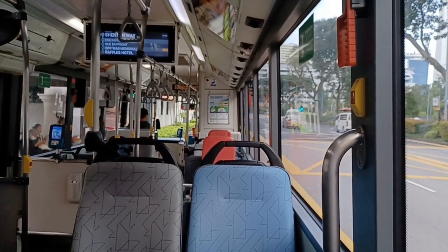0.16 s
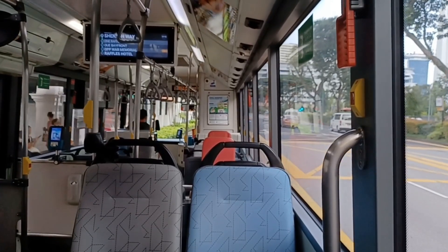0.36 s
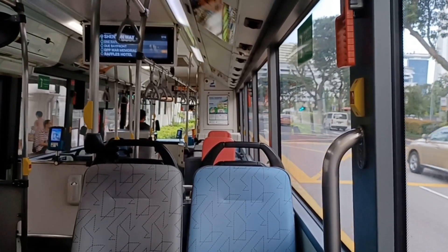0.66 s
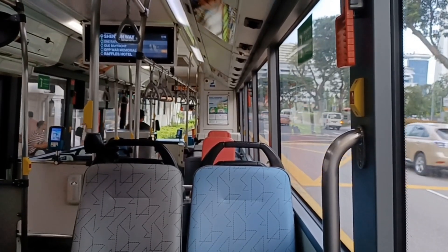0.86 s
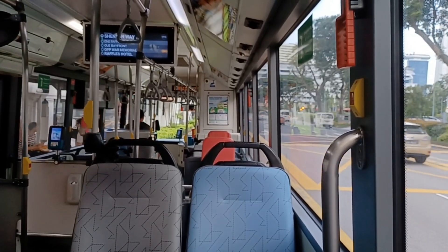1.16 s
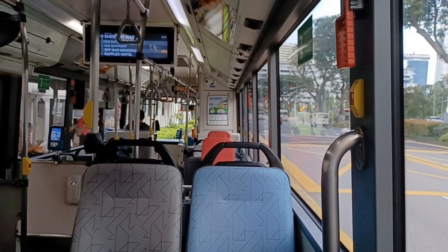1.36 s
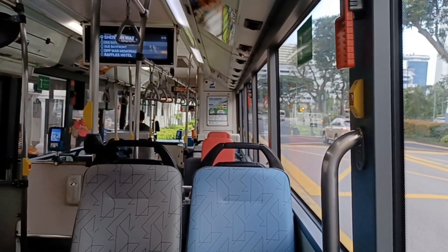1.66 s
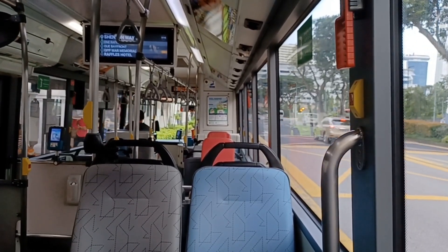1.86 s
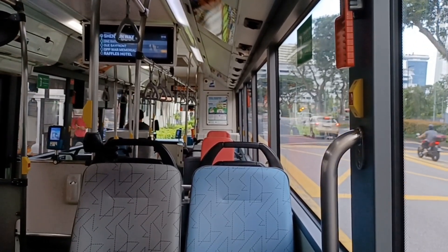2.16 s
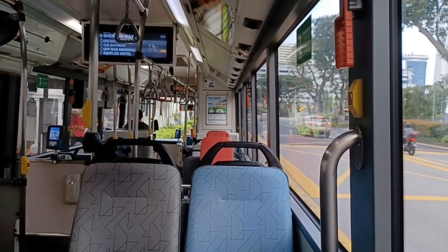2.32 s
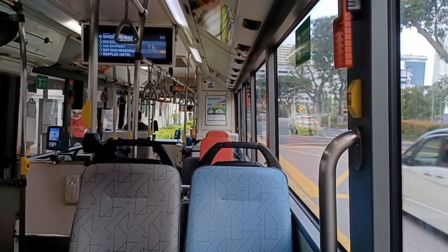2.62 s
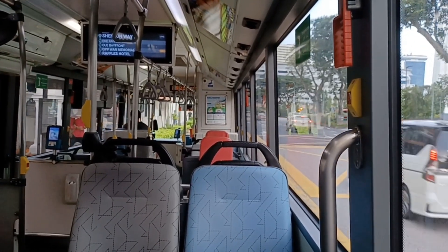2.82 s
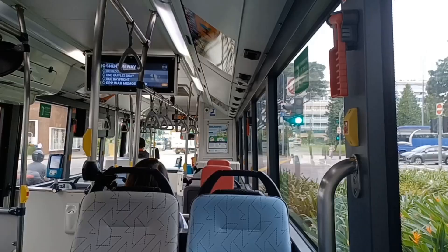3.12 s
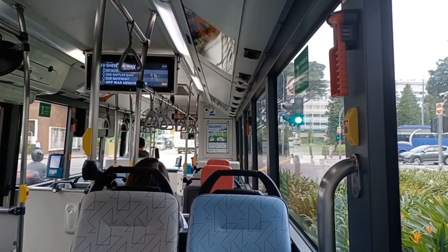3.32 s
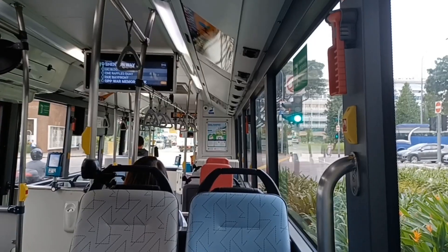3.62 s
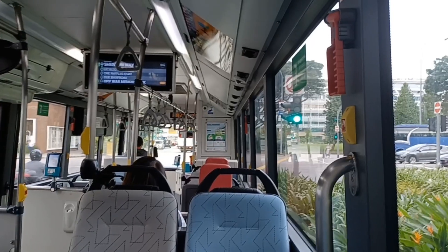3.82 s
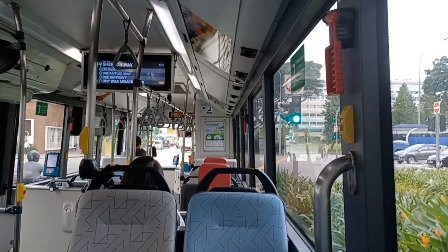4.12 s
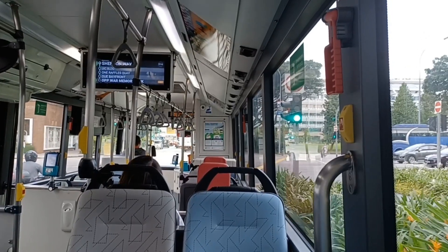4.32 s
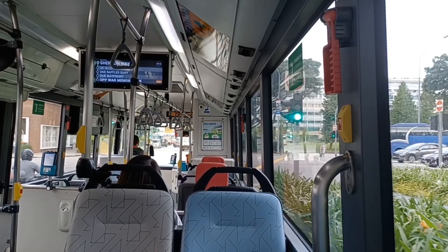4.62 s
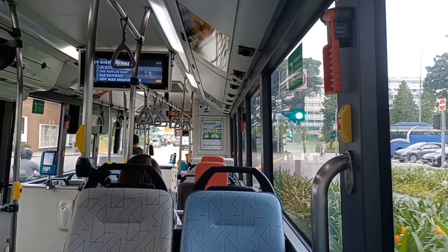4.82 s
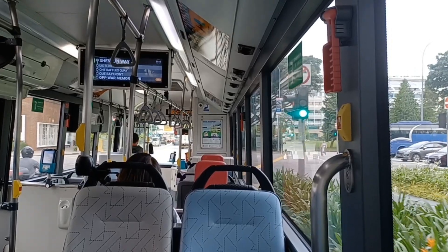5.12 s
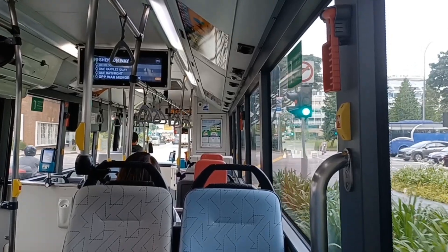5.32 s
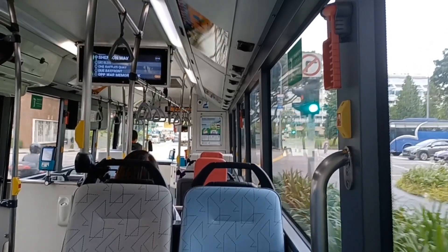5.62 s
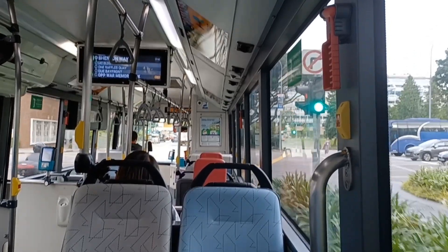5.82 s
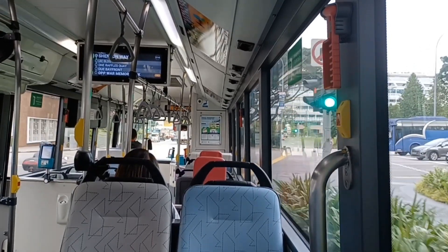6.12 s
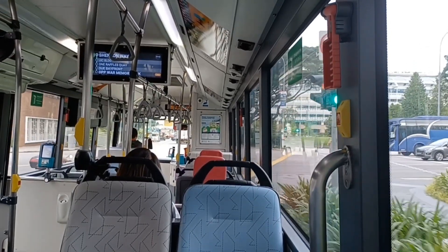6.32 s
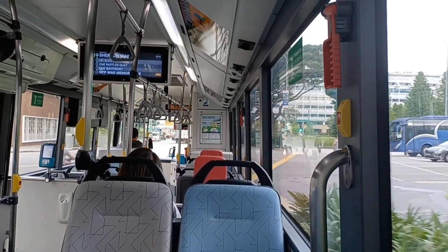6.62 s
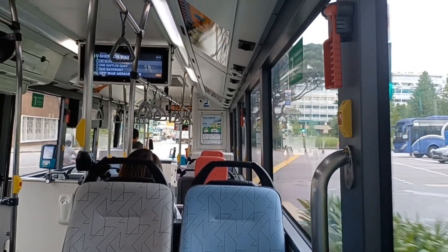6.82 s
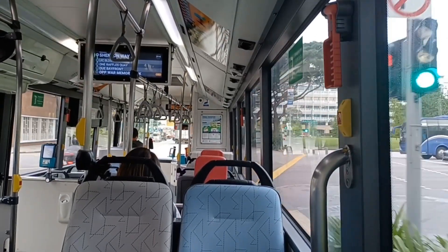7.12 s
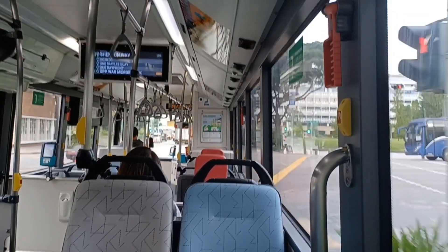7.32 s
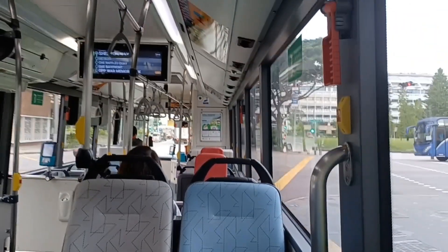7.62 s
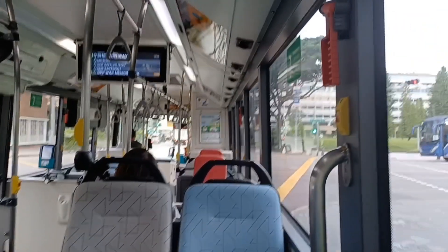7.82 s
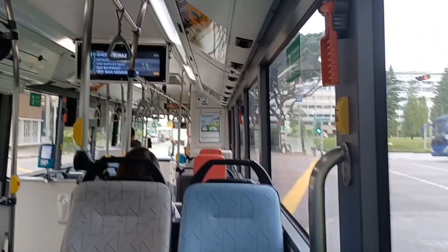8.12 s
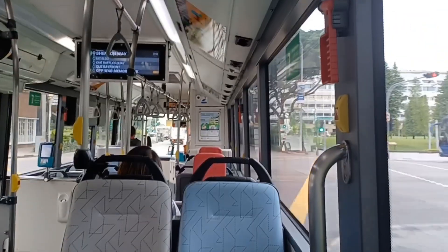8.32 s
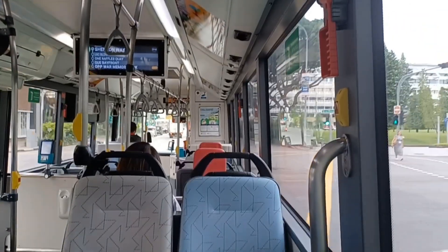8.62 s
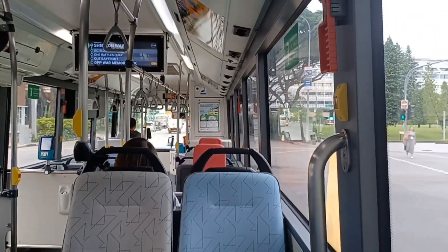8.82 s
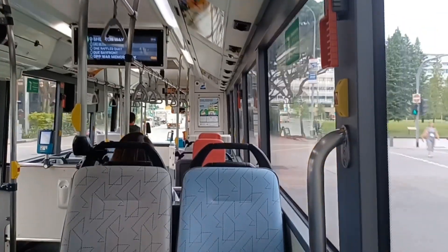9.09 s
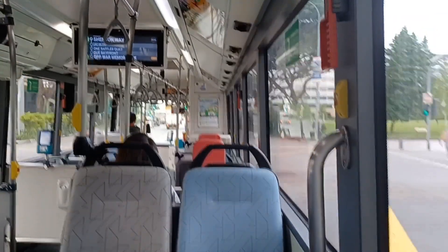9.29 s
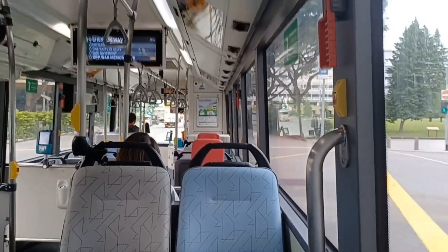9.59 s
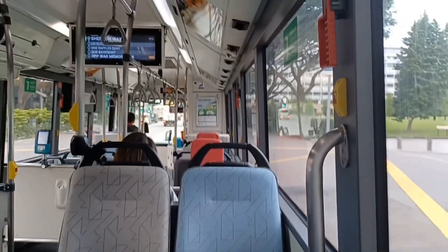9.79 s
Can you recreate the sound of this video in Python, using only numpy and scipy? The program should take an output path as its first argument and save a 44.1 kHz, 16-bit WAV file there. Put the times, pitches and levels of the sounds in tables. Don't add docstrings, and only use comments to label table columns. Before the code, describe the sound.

A diesel bus idles with bursts of escaping air, cuts to brief silence, then drives off growling through gear changes with rattling, squeaking trim.

```python
import sys
import numpy as np
from scipy import signal
from scipy.fft import rfft, irfft, next_fast_len
from scipy.io import wavfile
from scipy.ndimage import uniform_filter1d, map_coordinates

SR = 44100
rng = np.random.default_rng(int(sys.argv[2]) if len(sys.argv) > 2 else 0)


def pcm_store(signal):
    levels = np.round(np.clip(np.atleast_2d(signal), -1, 1) * 32767)
    wavfile.write(sys.argv[1], SR, levels.astype(np.int16).T)


def gain_from_db(level_db):
    decades = np.asarray(level_db, float) / 20
    return 10 ** decades


N = 438794
T = np.arange(N) / SR
SLOW, COARSE = T[::64], T[::16]
SIZE = next_fast_len(N)
HZ = np.maximum(np.arange(SIZE // 2 + 1) * SR / SIZE, 1)
LR = np.array([[1], [-1]])
BREAK_S = 2.993


def unit(x):
    return x / np.sqrt(np.mean(x ** 2))


def fine(x):
    return np.interp(T, SLOW, x)


def low(x):
    return np.interp(COARSE, SLOW, x)


def tone_samples(x):
    return signal.resample_poly(x, 16, 1)[:N]


def curve(table):
    s, value = np.transpose(table)
    return np.interp(SLOW, s, value)


def spectrum(table, hz=HZ):
    f, v = np.transpose(table)
    return np.interp(np.log(hz), np.log(f), v)


def peaks(table, hz=HZ):
    return sum(db / (1 + (2 * (hz - f) / w) ** 2) for f, w, db in table)


def window(t, start, end, rise, fall):
    return np.clip(np.minimum((t - start) / rise, (end - t) / fall), 0, 1)


def walk(rate):
    k = int(len(SLOW) / T[-1] / rate)
    held = np.repeat(rng.standard_normal(len(SLOW) // k + 1), k)
    return unit(uniform_filter1d(uniform_filter1d(held, k), k)[:len(SLOW)])


# f/Hz, correlation
CORRELATION = [(86, .995), (260, .94), (430, .42), (780, .42), (950, 0), (1120, -.46), (1300, -.38),
               (1800, -.25), (2150, .07), (15000, 0)]
# f/Hz, level/dB
LEAN_DB = [(60, -1.5), (110, 0), (200, -5.5), (380, -0.5), (700, -1), (1290, 0.0), (2380, 0.0), (4400, 0),
           (8120, -1), (15000, -3)]


def diffuse(gain):
    mid, side = rfft(rng.standard_normal((2, SIZE)))
    like = np.clip(spectrum(CORRELATION), -.995, .995)
    pair = np.sqrt(1 + like) * mid + np.sqrt(1 - like) * side * LR
    return gain * pair * gain_from_db(LR * spectrum(LEAN_DB) / 2)


def hiss(db):
    return unit(irfft(diffuse(gain_from_db(db)), SIZE)[:, :N])


# t/s, f/Hz
CRANK_HZ = [(3.55, 19.5), (3.8, 17.7), (4.3, 19.9), (4.8, 21.2), (5.7, 24.9), (5.85, 27.0), (6.3, 30.9),
            (6.5, 34.0), (6.8, 36.1), (7.05, 35.3), (7.65, 26.5), (7.95, 29.3), (8.5, 32.8), (8.72, 33.0),
            (9.0, 27.0), (9.15, 27.2), (9.3, 28.2), (9.95, 28.9)]
# t/s, level/dB
LOAD_DB = [(3.3, -26), (3.8, -8), (4.2, 2.5), (4.8, -4.5), (5.2, -4.5), (5.65, -7.5), (5.95, -1), (6.5, -1),
           (6.9, -2), (7.35, 1), (7.65, -4), (7.95, 0), (8.55, 2), (8.9, -0.5), (9.15, -1.5), (9.5, -2),
           (9.95, -1)]
# f/Hz, level/dB
BOOM_DB = [(36, -55), (44, -58), (46.5, -36.5), (62, -46.5), (88, -29), (108, -22), (132, -21), (180, -19)]
# f/Hz, width/Hz, level/dB
BOOM_PEAKS = [(74.6, 9.3, 13.5), (112.5, 6.6, 4.5), (147.1, 9.8, 7.5), (131.3, 7.9, 3), (137, 6, -2.5),
              (165.6, 12, -6.5)]
MAIN_ORDER_DB = [-0.068, 0.21, 1.6, -1.2]
# order/thirds, level/dB re neighbouring orders
UNEVEN_ORDERS = [(7, -2), (8, -5), (10, -5), (11, -7), (13, -10), (14, -11), (16, -14), (17, -15),
                 (18, -11), (21, -15), (24, -19)]
# order/thirds, level/dB, start t/s, end t/s
GEAR_WHINES = [(93, -44, 4.0, 5.2), (54, -38, 5.15, 5.9), (31, -38, 6.0, 9.95), (36, -40, 5.0, 7.4),
               (44, -41, 7.6, 9.95), (45, -41, 6.0, 8.9), (62, -41.5, 8.0, 8.9), (66, -41.5, 5.9, 7.5),
               (78, -44, 9.3, 9.95)]


def engine_orders():
    hz, load = uniform_filter1d(curve(CRANK_HZ), size=60), curve(LOAD_DB)
    levels = []
    for k, db in zip((2, 3, 4, 5), MAIN_ORDER_DB):
        levels.append(spectrum(BOOM_DB, k * hz) + peaks(BOOM_PEAKS, k * hz) + db + load)
    third_hz = hz / 3 * (1 + .001 * walk(6))
    cycle = 2 * np.pi * np.cumsum(low(third_hz)) * COARSE[1]

    def beside(k):
        if k < 15:
            return np.mean(levels[k // 3 - 2:k // 3], axis=0)
        return np.maximum(*levels[-2:])

    gains = [(k, gain_from_db(db + 2.5)) for k, db in zip((6, 9, 12, 15), levels)]
    gains += [(k, gain_from_db(beside(k) + db)) for k, db in UNEVEN_ORDERS]
    for k, db, start, end in GEAR_WHINES:
        gains.append((k, gain_from_db(db + 2.0) * window(SLOW, start, end, 0.12, 0.083)))
    out = 0
    for k, gain in gains:
        out = out + low(gain * gain_from_db(walk(9))) * np.sin(k * cycle + 2 * np.pi * rng.random())
    orders = np.sqrt(2) * tone_samples(out) * (T > BREAK_S) * gain_from_db(-1.3 * LR)
    return orders, 6 * np.interp(T, COARSE, cycle)


LAYER_CENTRE_HZ = [140, 500, 2200, 10000]
# f/Hz, level/dB per Hz
CABIN_DB = [(25, -33), (43, -43), (68, -12.5), (136, -1), (174, -8), (422, -18.5), (947, -28),
            (1110, -27.5), (2710, -39), (5030, -44), (6400, -54), (8300, -61.5), (12000, -60.5),
            (15600, -73.5)]
# f/Hz, width/Hz, level/dB
PANEL_PEAKS = [(127, 19, 2), (138.7, 14, 3.5), (78, 14, -2), (342, 11, 1.5), (493, 110, 2.5), (907, 59, 4),
               (948, 25, 5), (1658, 31, 5.5), (1438, 29, 8.5), (3964, 74, 4.5), (4920, 80, -1.5)]
# t/s, level/dB
SHAKE_DB = [(0, 0.5), (.66, -3), (1.65, 0), (1.98, 2.3), (2.31, 0), (2.97, 2), (3.6, 0.8), (4.2, 2),
            (4.6, 0.85), (5.6, 3.5), (6.2, 1.5), (6.8, 3), (7.7, 0), (8.4, 1.6), (9.2, -2.5), (9.95, -1.5)]
LAYER_SHAKE = [0.51, 0.74, 0.88, 0.33]
LAYER_IDLE_DB = [-3.5, -1.5, 1.36, -1]
LAYER_DRIFT_DB_S = [-0.17, 0.16, 0.072, -0.17]


def cabin_roar(firing):
    field = diffuse(gain_from_db(spectrum(CABIN_DB) + peaks(PANEL_PEAKS)))
    field /= np.sqrt(np.mean(irfft(field, SIZE) ** 2))
    shake, moving = curve(SHAKE_DB), SLOW > BREAK_S
    layers = []
    for share, idle_db, growth in zip(LAYER_SHAKE, LAYER_IDLE_DB, LAYER_DRIFT_DB_S):
        layers.append(share * shake + np.where(moving, growth * (SLOW - 4.5), idle_db))
    jolt, near, beat, out = walk(14), walk(4.1), np.cos(firing), 0
    for step in np.arange(0, 9.6, .5):
        hz = 25 * 2 ** step
        part = np.clip(1 - abs(2 * np.log2(HZ / hz)), 0, 1)
        place = np.interp(np.log(hz), np.log(LAYER_CENTRE_HZ), np.arange(4))
        db = sum(max(1 - abs(place - k), 0) * c for k, c in enumerate(layers))
        near = 0.85 * near + 0.67 * walk(6)
        db = db + (0.14 + 0.14 * place) * jolt + 0.31 * near
        pulse = 1 + 0.038 * min(place, 1.5) * beat
        out = out + fine(gain_from_db(db)) * pulse * irfft(field * part, SIZE)[:, :N]
    return gain_from_db(-15.5) * out


# t/s, held/s, jet level/dB, throat level/dB, leak level/dB re blow
BLOWS = [
    (0.112, .015, -52.5, -44, -26),
    (0.253, 0.11, -43.5, -29.5, -32.5),
    (1.652, .06, -48, -39.5, -13.5),
    (1.96, 0.081, -61, -44.5, -16.5),
    (2.351, 0.08, -32, -30.5, -19.5),
    (2.42, 0.06, -39, -29, -8.5),
]
# f/Hz, width/Hz, level/dB
VALVE_PIPES = [
    [(4500, 2000, 1.5)],
    [(835, 180, 19), (1400, 340, 20), (1986, 190, 15.5), (2430, 240, 19), (3300, 290, 16.5),
     (4150, 280, 7.5)],
    [(5650, 180, 11), (7400, 140, 20), (8750, 150, 7.5)],
    [(5530, 250, 6), (6900, 200, 16)],
    [(5900, 800, 12.5)],
    [(3900, 830, -0.5), (2200, 900, -0.5)],
]
PIPE_WANDER_S = [0, .0017, .0001, .0002, .0002, .0005]
# f/Hz, level/dB per Hz
JET_DB = [(4120, -37.5), (7000, -2), (7510, -3), (8140, -7), (9000, -1), (11900, -0.5), (12900, 1.5),
          (15600, -12)]
# f/Hz, level/dB per Hz
THROAT_DB = [(600, 2.5), (1400, 1.5), (2500, -3.5), (4200, 2.5), (5800, -3), (7500, -12.5), (9000, -26)]
# t/s, level/dB
LEAK_LEVEL = [
    (2.45, -58),
    (2.57, -42),
    (2.99, -43.5),
]
# f/Hz, level/dB per Hz
LEAK_DB = [(6000, -12), (8500, -14), (11300, -9), (12900, 0), (14200, -8), (15600, -7)]


def air_valves():
    rise_s, fall_db_s, linger_db_s = 0.012, 131.5, 7
    pan = gain_from_db(LR * -2 / 2)
    jet, flow = hiss(spectrum(JET_DB)), diffuse(gain_from_db(spectrum(THROAT_DB)))
    leaking = (T > LEAK_LEVEL[0][0]) * (T < BREAK_S)
    out = hiss(spectrum(LEAK_DB)) * fine(gain_from_db(curve(LEAK_LEVEL))) * leaking
    wander = fine(walk(22))
    for (s, held, jet_db, throat_db, leak_db), pipe, swing in zip(BLOWS, VALVE_PIPES, PIPE_WANDER_S):
        late = np.maximum(SLOW - s - rise_s - held, 0)
        opening = np.clip((SLOW - s) / rise_s, 0, 1)

        def opened(db):
            return opening * np.hypot(gain_from_db(-fall_db_s * late), gain_from_db(db - linger_db_s * late))

        on = (T > s) & (T < min(s + .7, BREAK_S))
        roar = unit(irfft(flow * gain_from_db(peaks(pipe)), SIZE)[:, :N])
        read_at = [(T + swing * wander)[on] * SR]
        roar = np.array([map_coordinates(r, read_at, order=1) for r in roar])
        jet_gain = fine(opened(leak_db - 10) * gain_from_db(jet_db + 4.0 + 0.92 * walk(30)))
        roar_gain = fine(opened(leak_db) * gain_from_db(throat_db + 2.5 + walk(30)))
        out[:, on] += jet_gain[on] * jet[:, on] * pan
        out[:, on] += roar_gain[on] * roar * pan
    return out


# t/s, peak level/dB, centre f/Hz, left minus right/dB
TRIM_TICKS = [(3.2555, -40, 10100, -17.5), (3.8884, -39.5, 12800, -5.5), (5.598, -28.5, 10900, 11.5),
              (5.9725, -44.5, 9570, 0.5), (6.067, -47.5, 9470, -1.5), (6.159, -51, 9350, -1.5),
              (7.4333, -34, 12000, -2), (8.237, -35, 9500, 11), (8.3482, -41.5, 10300, 0.5),
              (8.385, -41, 9620, 8.5), (8.651, -40, 12000, 3), (8.801, -43.5, 11000, -0.5),
              (9.287, -44.5, 10500, 3.5), (9.704, -40, 12000, 3), (9.907, -37.5, 11000, 5),
              (8.5134, -32, 9750, 4.5), (8.6194, -41, 11300, -1.5), (8.677, -43.5, 9820, 2.5),
              (8.7224, -38, 10200, 3.5), (8.7583, -42, 10400, 3), (8.7772, -38.5, 11200, 1),
              (8.884, -27.5, 12060, 6), (8.9244, -33.5, 13400, 3.5), (9.1743, -35.5, 9590, 5),
              (9.4228, -42, 11000, 3.5), (9.4676, -38, 9470, 8.5), (9.6917, -39, 13100, 11.5),
              (9.7321, -35.5, 13700, 4.5), (9.8186, -35, 9670, 1), (9.8982, -32, 9950, 5.5)]


def trim_ticks():
    out, t = np.zeros((2, N + 2000)), np.arange(2000) / SR
    shape = np.exp(-t / .0005) + .4 * np.exp(-abs(t - .002) / .0004) + .08 * np.exp(-t / .008)
    for (s, db, hz, pan_db), grit in zip(TRIM_TICKS, rng.standard_normal((len(TRIM_TICKS), 2, 2000))):
        band = signal.butter(2, [hz * 0.52, min(hz * 1.55, 15500)], "band", fs=SR, output="sos")
        i = int(s * SR)
        out[:, i:i + 2000] += gain_from_db(db + 2.0 + LR * pan_db / 2) * signal.sosfilt(band, grit * shape)
    return out[:, :N]


# t/s, level/dB, lasting/s
BUZZ_BUMPS = [(3.54, -63, .03), (3.93, -55.5, .12), (4.24, -54.5, .03), (5.3, -66.5, .25), (5.6, -48, .015),
              (5.91, -65, .07), (6.85, -59, .2), (7.46, -51.5, 0.073), (7.74, -54, .04), (8.1, -59, 0.092),
              (8.235, -48, 0.031), (8.5, -56, .04), (8.63, -62.5, .025), (8.73, -55, .01),
              (8.78, -54.5, .01), (8.93, -55, .05), (9.01, -58.5, .02), (9.28, -62.5, .05),
              (9.43, -62, .012), (9.47, -53.5, .008), (9.74, -60.5, .03), (9.88, -57.5, 0.056)]


def trim_buzz():
    floor_db, cracks_per_s, crack_db = -66, 50, 5
    power = gain_from_db(2 * floor_db)
    for s, db, lasting in BUZZ_BUMPS:
        power = power + gain_from_db(2 * db) * np.exp(-2 * abs(SLOW - s) / lasting)
    chance, size = rng.random(len(SLOW)), rng.exponential(size=len(SLOW))
    cracks = (chance < cracks_per_s * SLOW[1]) * gain_from_db(crack_db + 3.2 * np.minimum(size, 2))
    rattle = gain_from_db(3.5 * walk(60) + 2.5 * walk(25) - 0.5)
    grain = fine(np.sqrt(power) * (rattle + cracks))
    bright = spectrum([(5000, -17), (8000, -15.0), (11000, -4.5), (13500, -4), (15500, -14)])
    return hiss(bright) * grain * (T > BREAK_S)


# t/s, f/Hz, level/dB, length/s
JOINT_SQUEAKS = [(3.58, 4920, -52, .15), (4.12, 4950, -52, .12), (4.3, 4950, -56, .12),
                 (5.5, 4900, -55, 0.17), (4.47, 5000, -52, .1), (4.72, 5000, -49, 0.075),
                 (4.994, 4870, -41, .08), (5.17, 4950, -48, .07), (5.38, 4950, -48, .1),
                 (5.65, 4900, -55, .1), (5.87, 4930, -45, 0.064), (9.87, 4310, -41, .08)]


def squeaks():
    out = np.zeros((2, N))
    grits = rng.standard_normal((len(JOINT_SQUEAKS), 2, 8000))
    for (s, hz, db, length), grit in zip(JOINT_SQUEAKS, grits):
        band = signal.butter(2, [hz - 70, hz + 70], "band", fs=SR, output="sos")
        i = int(s * SR)
        size = min(int(length * SR), N - i)
        whistle = unit(signal.sosfilt(band, grit))[:, -size:]
        out[:, i:i + size] += gain_from_db(db) * np.hanning(size) * whistle
    return out


# start t/s, end t/s, f/Hz, width/Hz, level/dB
JOINT_CHAFE = (3.3, 6.15, 4920, 110, -56.5)


def chafe():
    start, end, hz, width, db = JOINT_CHAFE
    band = signal.butter(2, [hz - width / 2, hz + width / 2], "band", fs=SR, output="sos")
    whistle = unit(signal.sosfilt(band, rng.standard_normal((2, N))))
    return whistle * fine(gain_from_db(db + 3.9 * walk(7)) * window(SLOW, start, end, .3, .2))


# f/Hz, level/dB
HUM_PARTIALS = [(38.6, -57), (77.2, -29), (154, -32.5), (235, -36.5), (295, -42)]


def compressor():
    out = 0
    for hz, db in HUM_PARTIALS:
        level = low(gain_from_db(db + 5.1 * walk(3.3)))
        pitch_hz = low(hz * (1 + 0.00593 * walk(2)))
        out = out + level * np.sin(2 * np.pi * np.cumsum(pitch_hz) * COARSE[1])
    return tone_samples(out) * gain_from_db(-1.2 * LR)


def scene():
    orders, firing = engine_orders()
    engine = orders + cabin_roar(firing)
    trim = trim_ticks() + trim_buzz() + squeaks() + chafe()
    return engine + air_valves() + trim + compressor()


def top_cut(x):
    return signal.sosfilt(signal.butter(12, 15730, fs=SR, output="sos"), x)


def record(dry):
    resume_s, fade_s, cut_s = 3.2075, 0.2, .004
    closing = np.clip((BREAK_S + .002 - T) / cut_s, 0, 1) ** 2
    opening = np.clip((T - resume_s) / fade_s, 0, 1) ** 0.72
    gate = np.where(T < BREAK_S, closing, opening)
    mix = np.clip(np.tanh(0.43 * dry * gate) / 0.47, -1, 1)
    return top_cut(mix)


dry = scene()
out = record(dry)
pcm_store(out)
```